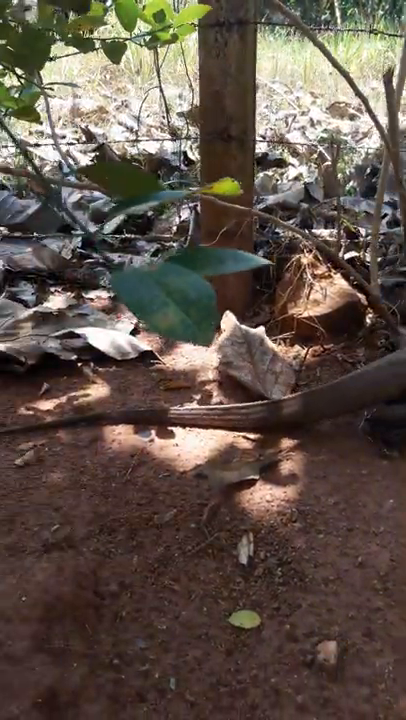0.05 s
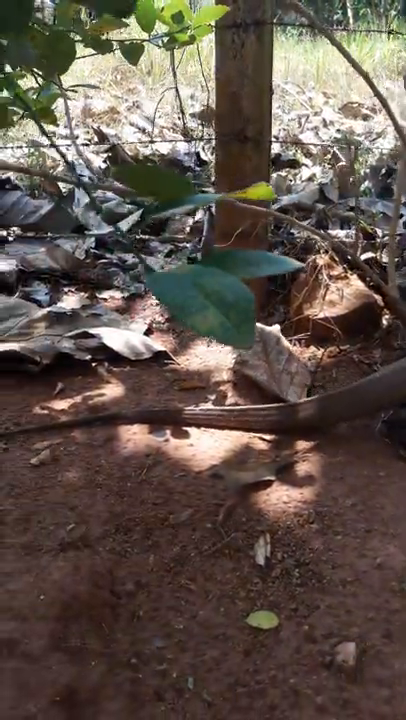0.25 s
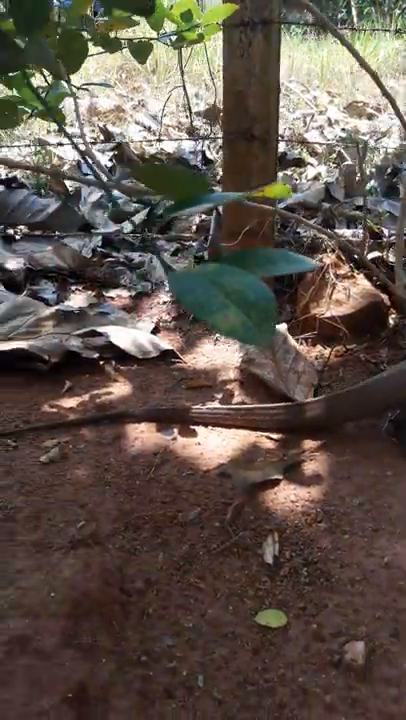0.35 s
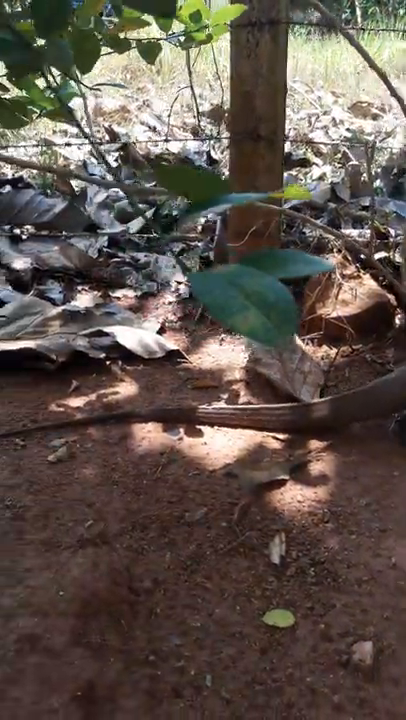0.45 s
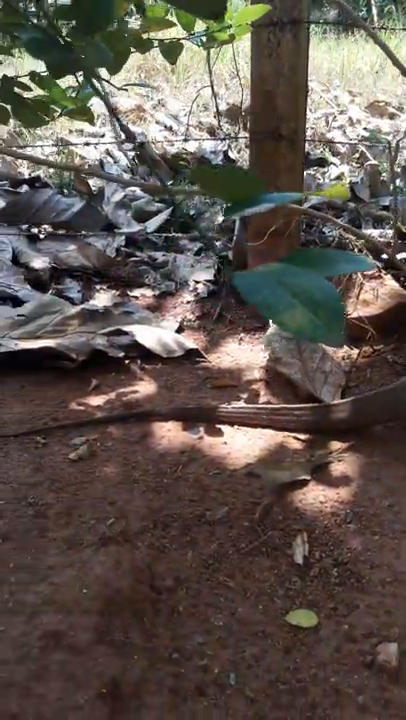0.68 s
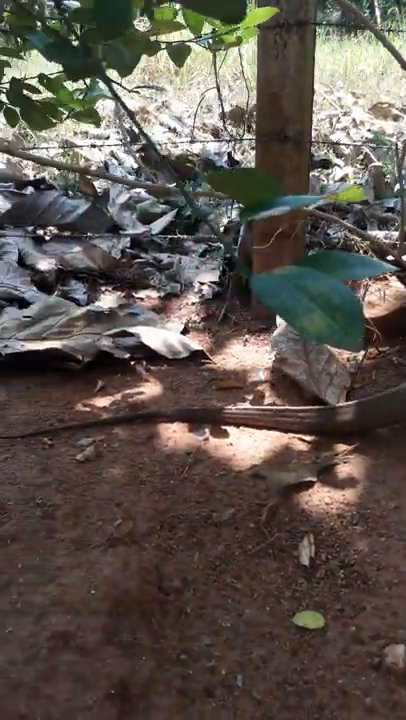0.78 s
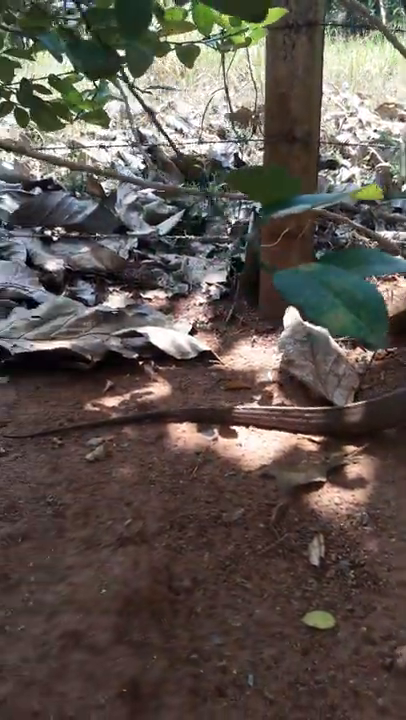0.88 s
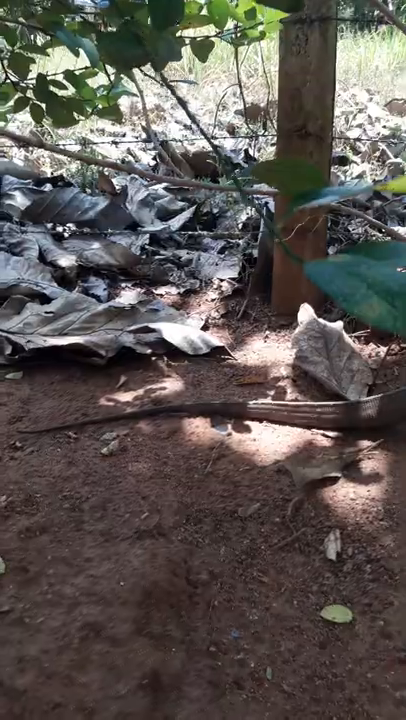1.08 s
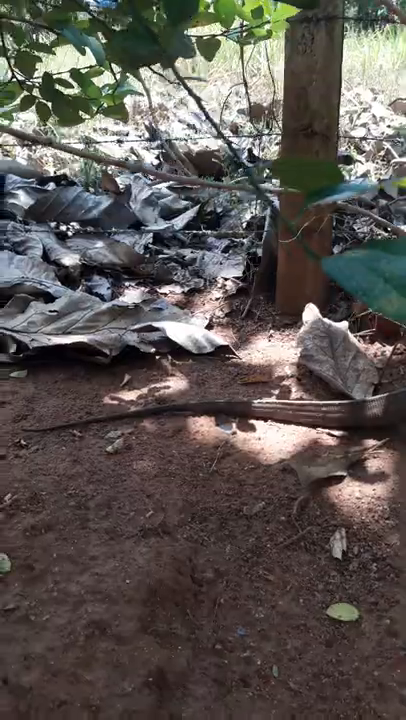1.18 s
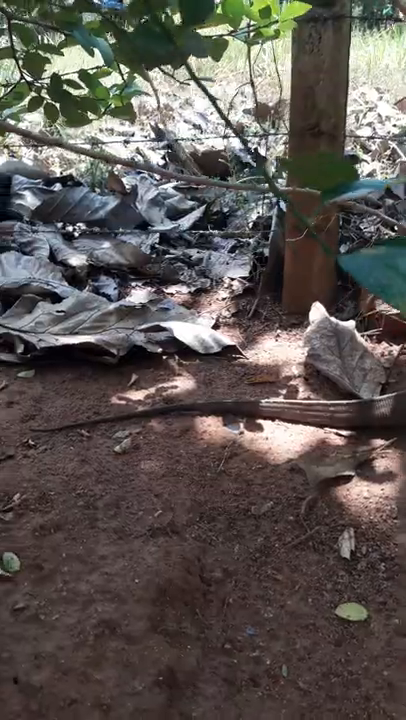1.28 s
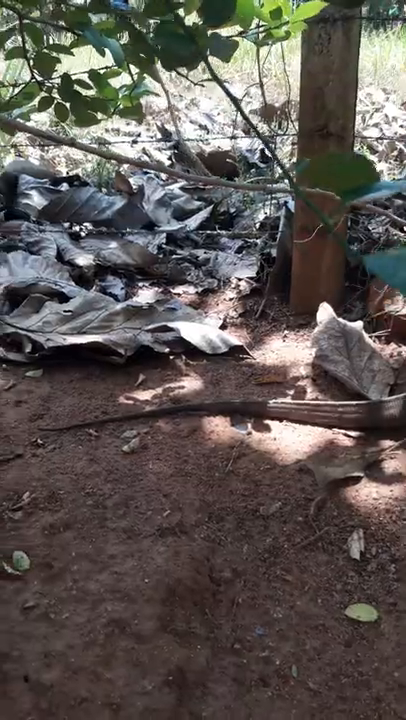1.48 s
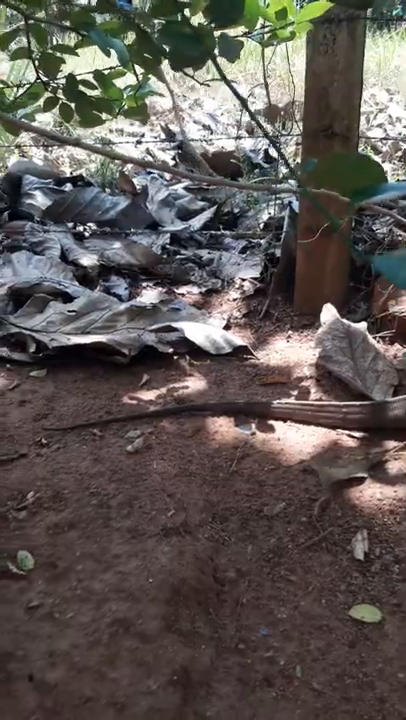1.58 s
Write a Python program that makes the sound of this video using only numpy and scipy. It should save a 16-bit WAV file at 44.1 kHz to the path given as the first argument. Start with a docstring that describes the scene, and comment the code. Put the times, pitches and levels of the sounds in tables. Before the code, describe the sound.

Foliage and dry fallen leaves rustle quietly close to the microphone, outdoors. One sharp twig crack comes early, followed by more rustling, light crackles and leaves brushing together, thinning out above a faint rumble of wind.

```python
"""Rustling leaves and a snapping twig

Foliage and dry fallen leaves rustle in gentle swells, made of countless tiny contacts, over a low
rumble of wind and a faint hum. Single leaves brush past each other, and brittle ones tick as they
give way. Early on a dry twig snaps sharply and rings for a moment.
The sound is nearly mono, bright up to 7 kHz and much weaker above."""
import sys
import numpy as np
from scipy import signal
from scipy.fft import rfft, irfft, next_fast_len
from scipy.io import wavfile
from scipy.ndimage import map_coordinates

SR = 44100
rng = np.random.default_rng(int(sys.argv[2]) if len(sys.argv) > 2 else 0)


def dump(signal):
    """Clip the signal to [-1, 1] and save it as 16-bit WAV at the path in sys.argv[1]."""
    limited = np.clip(np.atleast_2d(signal).T, -1, 1)
    pcm = np.round(limited * 32767).astype(np.int16)
    wavfile.write(sys.argv[1], SR, pcm)


N = 72765

# The tone of a dry leaf's edge. Each row: frequency in Hz, level in dB.
DRY_LEAF_TONE = [(100, -14.5), (400, -4.5), (1200, 1.5), (2200, 5), (6000, 1.5), (16000, 0)]
CONTACTS_PER_S = 1800


def amp(db):
    """Turn decibels into a gain."""
    return 10 ** (np.asarray(db) / 20)


def unit(x):
    """Scale a signal to an average (rms) level of 1."""
    return x / np.sqrt(np.mean(x ** 2) + 1e-20)


def clock():
    """The time of every sample, in seconds."""
    return np.arange(N) / SR


def curve(rows):
    """Join (seconds, value) rows with straight lines."""
    return np.interp(clock(), *np.transpose(rows))


def colour(points):
    """Turn (Hz, dB) rows into a tone: a function that gives the gain at any frequency."""
    hz, db = np.transpose(points)
    return lambda f: amp(np.interp(np.log(f + 1), np.log(hz + 1), db))


def wobble(rate):
    """A smooth curve through `rate` random values a second."""
    return map_coordinates(rng.standard_normal(int(N * rate / SR) + 4), [clock() * rate])


def filtered(x, tone):
    """Give a signal a tone, with a filter that rings only after each sound, never before it."""
    size = 2 * next_fast_len(N)
    gain = np.maximum(tone(np.fft.rfftfreq(size, 1 / SR)), 1e-6)
    cepstrum = irfft(np.log(gain), size)
    # Fold the part before time zero onto the part after it.
    cepstrum[1:size // 2] *= 2
    cepstrum[size // 2 + 1:] = 0
    return irfft(rfft(x, size) * np.exp(rfft(cepstrum)), size)[:N]


def noise(tone):
    """Noise with the given tone, at an average level of 1."""
    return unit(filtered(rng.standard_normal(N), tone))


def resonance(f, hz, width):
    """The gain at frequency f of something that rings at hz."""
    return f * width / np.hypot(hz * hz - f * f, f * width)


def leaf_tone(hz, ring_db=11.5, sharpness=5.885):
    """The tone of a dry leaf that rings at one pitch."""
    edge = colour(DRY_LEAF_TONE)
    return lambda f: edge(f) * np.hypot(1, amp(ring_db) * resonance(f, hz, hz / sharpness))


def burst(start, rise_s, fade_s):
    """A level that jumps up, then dies away by 60 dB every fade_s seconds."""
    age = np.maximum(clock() - start, 0)
    return (1 - np.exp(-age / rise_s)) * amp(-60 * age / fade_s)


def contacts(per_s, spread_db=5.5):
    """Tiny clicks of uneven size at random times, as leaves touch."""
    hits = rng.random(N) < per_s / SR
    signs = rng.choice([-1, 1], N)
    return hits * signs * amp(spread_db * np.minimum(rng.standard_normal(N), 2))


def air():
    """A very faint wash of air, the part that differs between left and right."""
    # The air's tone. Each row: frequency in Hz, level in dB.
    air_tone = [(20, -10), (120, 2), (300, 7), (700, 6), (1500, 0.5), (4000, -18), (7000, -32.5),
                (10000, -15), (16000, -4.5)]
    return amp(-73) * noise(colour(air_tone))


def hum(hz=122.27, width_hz=10.422):
    """A faint low hum: a band of noise so narrow that it wavers."""
    return amp(-67.5) * noise(lambda f: resonance(f, hz, width_hz) ** 2)


def wind():
    """Wind rumbles with a faint far hiss, and a few soft puffs hit the microphone."""
    # The tones of the rumble and of a puff. Each row: frequency in Hz, level in dB.
    rumble_tone = [(20, -15.5), (45, -19.5), (80, -3.5), (125, -2.5), (170, -4.5), (230, -10.5),
                   (450, -15.5), (1000, -16.5), (3000, -20.5), (7000, -41.5), (9000, -47.5), (16000, -45.5)]
    puff_tone = [(15, -6.5), (35, -9), (60, 6.5), (90, 1.5), (160, -24.5), (500, -43), (16000, -82.5)]
    # The wind's strength. Each row: time in seconds, level in dB.
    strength = [(0, -55.5), (.3, -55.5), (.52, -60.5), (.8, -57.5), (.92, -58), (1.02, -57), (1.3, -60.5),
                (1.45, -58.5), (1.65, -61)]
    # The puffs. Each row: loudest moment in seconds, time to swell or fade in seconds, level in dB.
    puffs = [(0.683, 0.0672, -67), (0.921, 0.0604, -61.5), (1.592, 0.0527, -62)]
    rumble = noise(colour(rumble_tone)) * amp(curve(strength) + 0.3572 * wobble(10.533))
    puff_level = sum(amp(db) * np.exp(-((clock() - peak) / width) ** 2) for peak, width, db in puffs)
    return rumble + puff_level * noise(colour(puff_tone))


def twig_snap(rise_s=0.0004797):
    """Each crack makes the twig ring and tears fibres; the surroundings scatter a short echo."""
    # The cracks and their rebounds. Each row: start in seconds, level in dB.
    cracks = [(0.2124, -36), (0.2134, -12), (.218, -32), (0.2243, -29)]
    # The notes the twig rings at. Each row: pitch in Hz, level in dB, seconds to fade by 60 dB.
    twig_notes = [(333, -22.5, 0.03304), (705.66, -22, 0.04667), (925, -30, 0.03773),
                  (1220.6, -16, 0.03885), (1410, -14, 0.03754), (1552.4, -10, 0.01809), (2150, -5, 0.01158),
                  (2407, -6.5, 0.01974), (2886.4, -3, 0.019237), (3330, -13, 0.02782),
                  (3611.8, -2.5, 0.01821), (4330, -9, 0.01304), (5854.8, -3, 0.01562),
                  (5993.4, -5, 0.01278), (6760, -9.5, 0.009875), (7221.5, -5, 0.010914)]
    # The tone of splintering wood. Each row: frequency in Hz, level in dB.
    splinter_tone = [(30, -30.5), (80, -4), (200, 0.5), (600, -10), (1700, -3), (3300, 3.5), (5000, -1),
                     (6500, 1.5), (9000, 3.5), (16000, -7)]
    out, t = np.zeros(N), clock()
    for start, db in cracks:
        ring = np.zeros(N)
        for hz, note_db, fade_s in twig_notes:
            level = amp(note_db + rng.normal(0, 1)) * burst(start, rise_s, fade_s)
            ring += level * np.sin(2 * np.pi * (hz * t + rng.random()))
        fibres = amp(-0.5) * burst(start, rise_s, fade_s=0.021206) * noise(colour(splinter_tone))
        echo = amp(-21.5) * burst(start, rise_s=0.002689, fade_s=0.1736) * noise(colour(splinter_tone))
        out += amp(db) * (ring + fibres + echo)
    return out


def leaf_ticks(rise_s=0.00013333):
    """Brittle leaves give way with a tiny crack and a short ping."""
    # Each row: start in seconds, level in dB, ping pitch in Hz, ping level against the crack in dB.
    ticks = [(0.0228, -42.5, 5525, 1.5), (0.125, -43.5, 6515, -5), (0.1375, -39.5, 8866, 4),
             (.4092, -43.5, 5965, -6.5), (0.4351, -40, 6582, -10), (0.44, -29.5, 2120, -9.5),
             (0.484, -57.5, 11160, -3.5), (0.7469, -29.5, 1223, -7), (.757, -37, 6817, -14.5),
             (.919, -46.5, 2998, 6), (0.974, -40.5, 6613, -9), (1.004, -44, 9500, -8.5),
             (1.054, -54.5, 10490, -8.5), (1.072, -44.5, 1171, -4), (1.1014, -38.5, 11000, -5),
             (1.106, -35.5, 4098, -3), (1.389, -50, 6322, -1), (1.401, -45.5, 6211, 1.5),
             (1.4699, -45, 5842, 3.5), (1.575, -40.5, 1958, -7.5)]
    out = np.zeros(N)
    for start, db, hz, ping_db in ticks:
        crack = burst(start, rise_s, fade_s=0.01343) * noise(colour(DRY_LEAF_TONE))
        ping = burst(start, rise_s, fade_s=0.0234) * np.sin(2 * np.pi * hz * (clock() - start))
        out += amp(db) * (crack + amp(ping_db) * ping)
    return out


def leaf_brushes():
    """One leaf slides over another, making a short grainy swell."""
    # Each row: loudest moment, rise time and fall time in seconds, level in dB, leaf pitch in Hz.
    brushes = [(0.552, 0.01144, 0.005028, -46.5, 6645), (0.557, 0.003044, 0.00601, -43, 3101),
               (0.72, 0.00643, 0.00773, -42.5, 6809), (.94, 0.01057, 0.01094, -44.5, 2707),
               (1.401, 0.002181, 0.011223, -44, 5845), (1.414, 0.002238, 0.01538, -50.5, 3697),
               (1.485, 0.006896, 0.00866, -48, 4135), (1.629, 0.0073, 0.02398, -53, 3388)]
    out, t = np.zeros(N), clock()
    for peak, rise, fall, db, hz in brushes:
        swell = amp(db) * np.exp(-np.maximum((peak - t) / rise, (t - peak) / fall))
        tone = leaf_tone(hz)
        grains = unit(filtered(contacts(CONTACTS_PER_S), tone))
        out += swell * unit(0.5 * grains + noise(tone))
    return out


def rustle():
    """Many leaf contacts, a soft hiss and fine crackles swell together, brighter when louder."""
    # The rustle's strength. Each row: time in seconds, level in dB.
    strength = [(0, -52), (.035, -48), (.1, -52.5), (.165, -50), (.2, -45), (.285, -46), (.32, -54),
                (.45, -54), (.478, -59), (.525, -58.5), (.575, -52), (.635, -55.5), (.72, -47.5),
                (.775, -44), (.825, -45.5), (.885, -52), (.97, -50.5), (1.08, -53.5), (1.185, -56),
                (1.225, -63), (1.335, -65.5), (1.425, -58.5), (1.51, -55.5), (1.555, -64.5), (1.65, -64.5)]
    # The tone of the foliage. Each row: frequency in Hz, level in dB.
    foliage_tone = [(100, -32), (300, -3.5), (700, -0.5), (1300, -1), (3000, 1), (5000, -0.5), (6800, -0.5),
                    (10000, 0), (16000, -6)]
    strength_db, tone = curve(strength), colour(foliage_tone)
    grains = amp(-3.5) * unit(filtered(contacts(CONTACTS_PER_S), tone))
    leaves = grains + noise(tone)
    # The further the strength falls below -39 dB, the more of the treble is subtracted.
    treble = signal.sosfiltfilt(signal.butter(2, 7820, "high", fs=SR, output="sos"), leaves)
    leaves += treble * (amp(0.4173 * (strength_db + 39)) - 1)
    # Each crackle is a very short burst of high leaf noise.
    clicks = np.abs(contacts(per_s=97))
    crackle_level = signal.fftconvolve(clicks, burst(0, rise_s=0.000262, fade_s=0.006))[:N]
    crackles = amp(-9.5) * unit(crackle_level * noise(leaf_tone(hz=9360)))
    flutter_db = 1.9613 * wobble(70.852)
    return (leaves + crackles) * amp(strength_db + flutter_db)


def scene():
    """Everything sits in the centre; only the air adds a little width."""
    centre = rustle() + leaf_brushes() + leaf_ticks() + twig_snap() + wind() + hum()
    side = air()
    return np.array([centre + side, centre - side])


def record(dry, top_hz=15900):
    """The microphone is strongest near 7 kHz, weaker above that, and hears nothing past top_hz."""
    # The microphone's tone. Each row: frequency in Hz, gain in dB.
    microphone_tone = [(20, 0.5), (5300, 0.5), (6200, 5), (7150, 7), (7800, -10.5), (11000, -6),
                       (16000, -4)]
    heard = np.array([filtered(channel, colour(microphone_tone)) for channel in dry])
    size = 2 * next_fast_len(N)
    in_range = np.fft.rfftfreq(size, 1 / SR) < top_hz
    return irfft(rfft(heard, size) * in_range, size)[:, :N]


dry = scene()
out = record(dry)
dump(out)
```